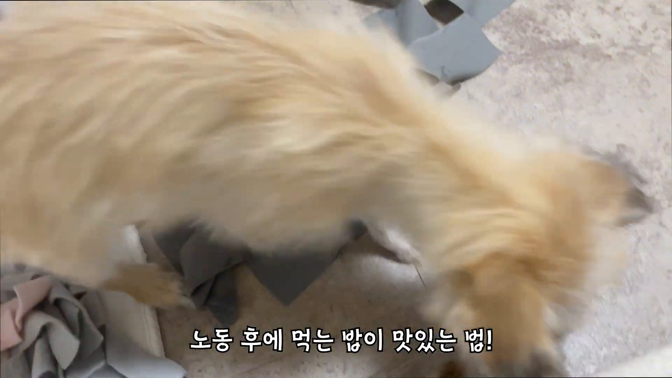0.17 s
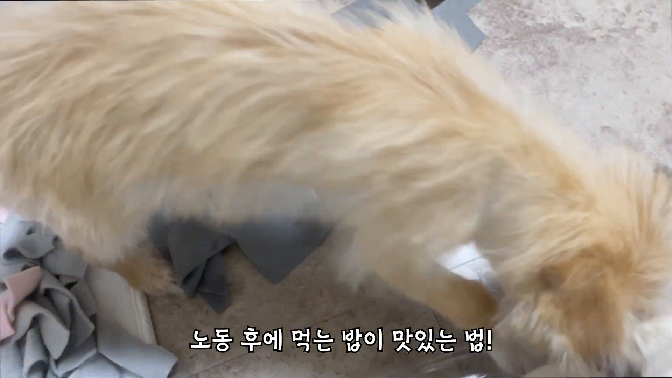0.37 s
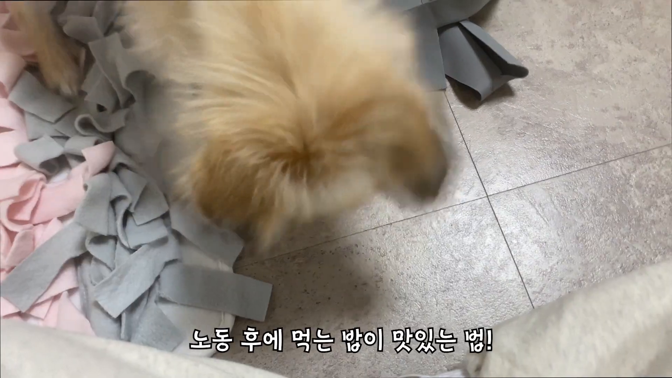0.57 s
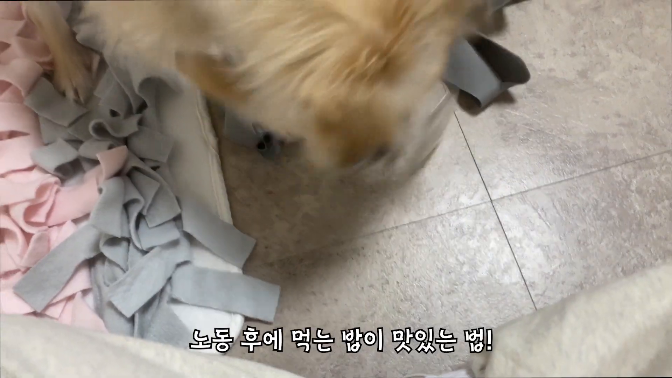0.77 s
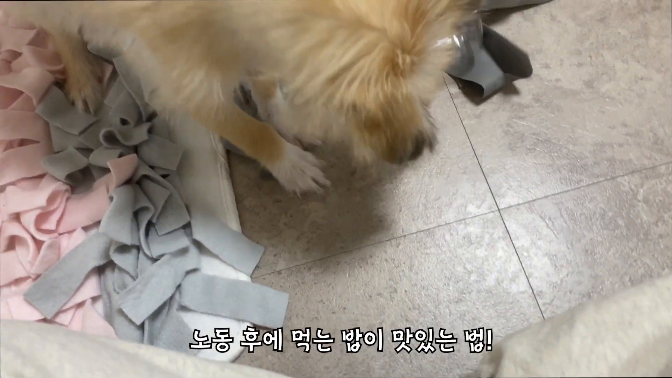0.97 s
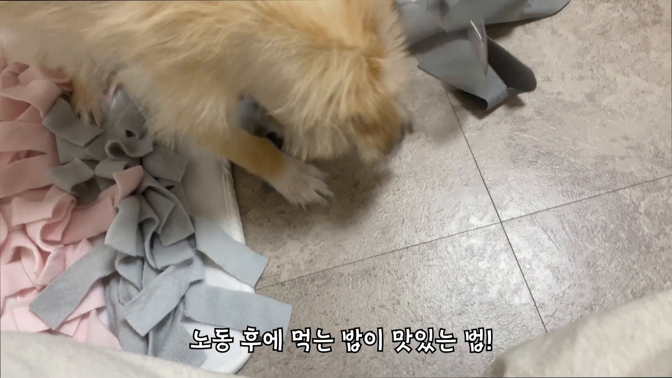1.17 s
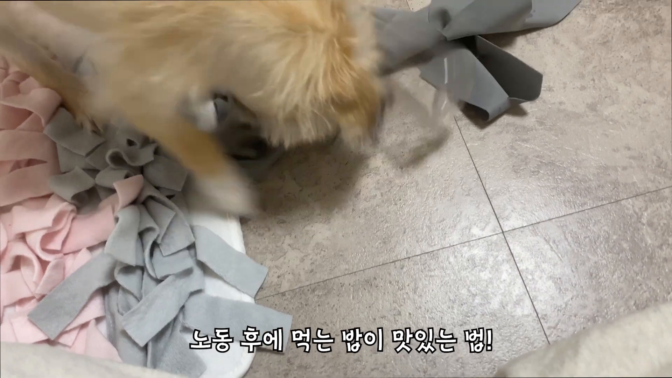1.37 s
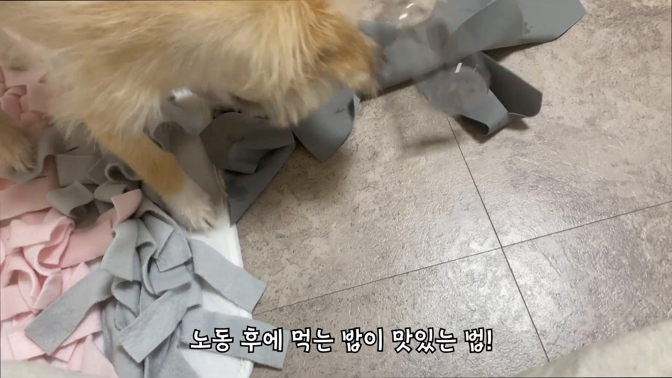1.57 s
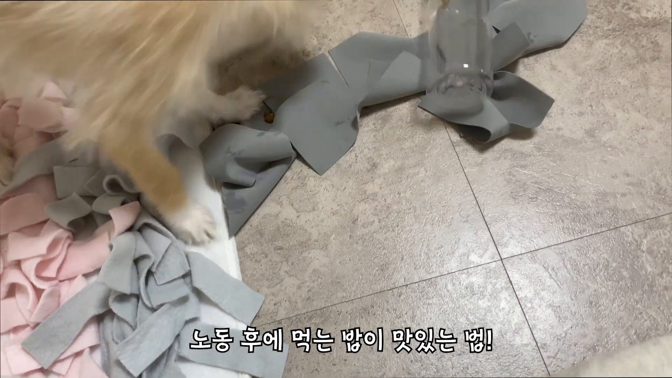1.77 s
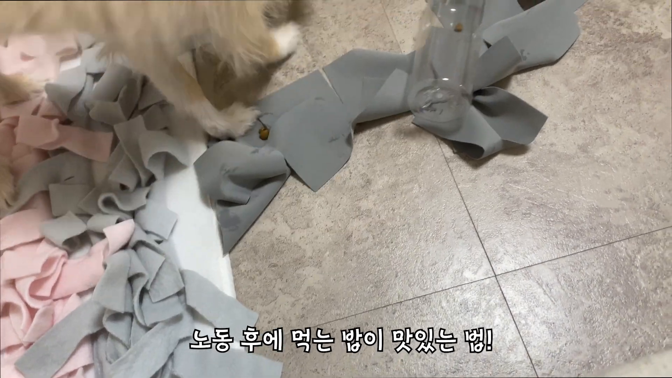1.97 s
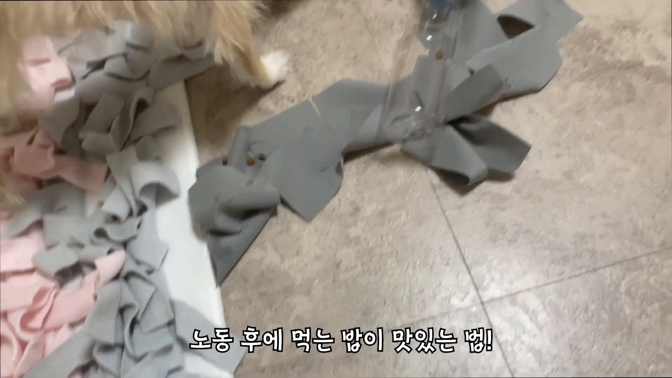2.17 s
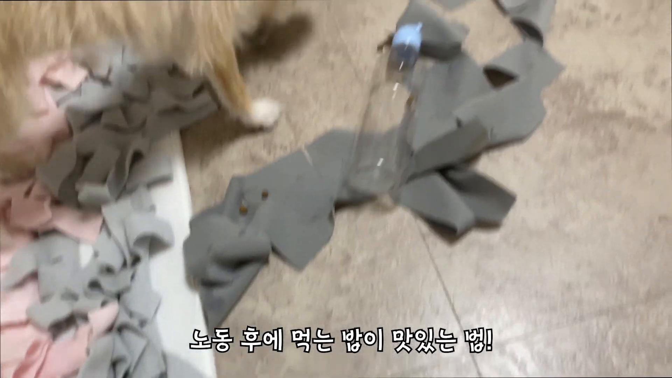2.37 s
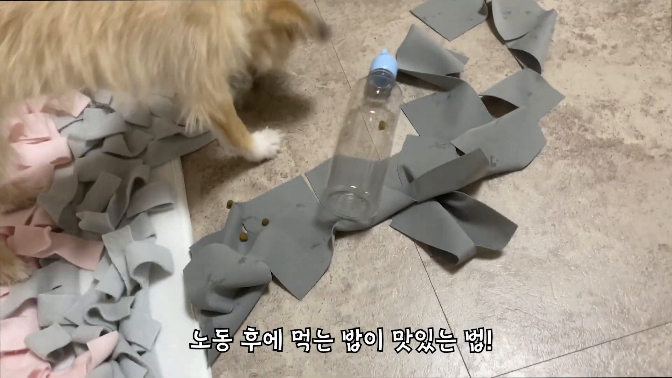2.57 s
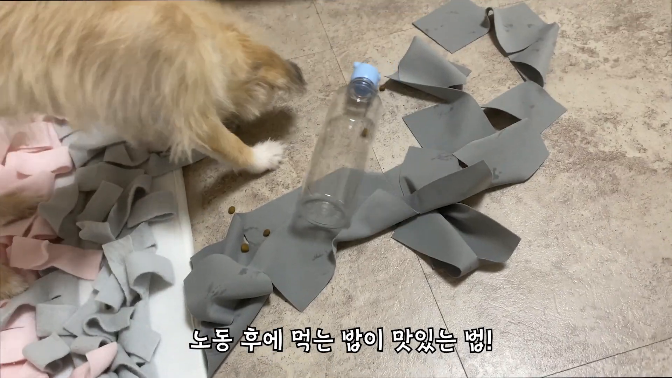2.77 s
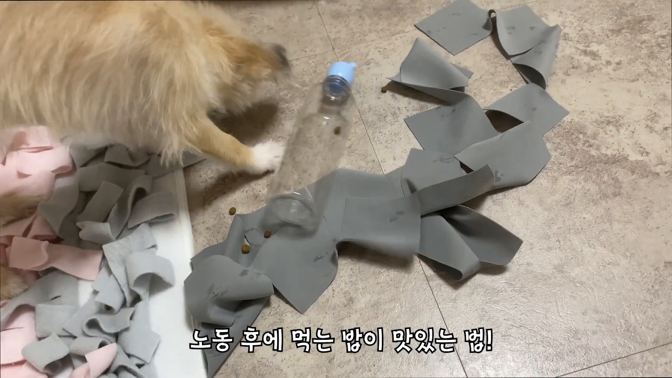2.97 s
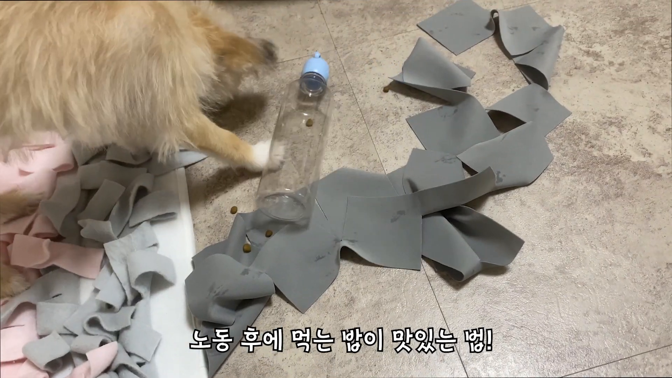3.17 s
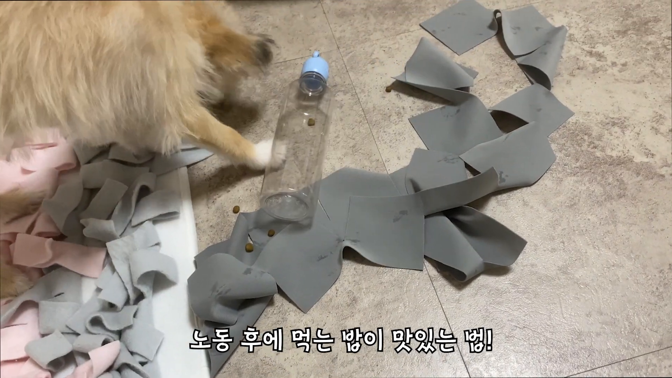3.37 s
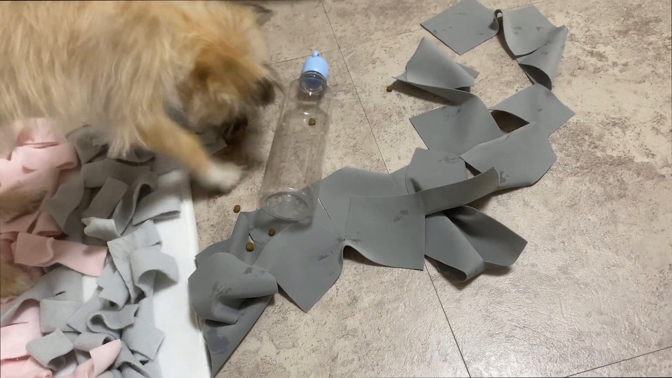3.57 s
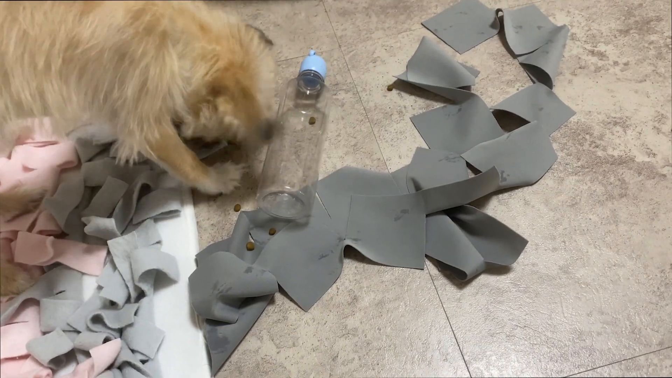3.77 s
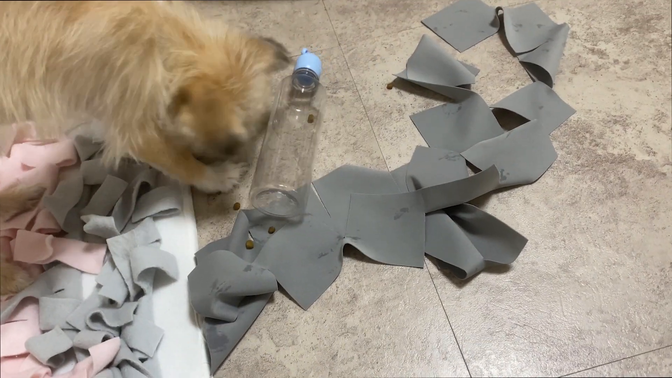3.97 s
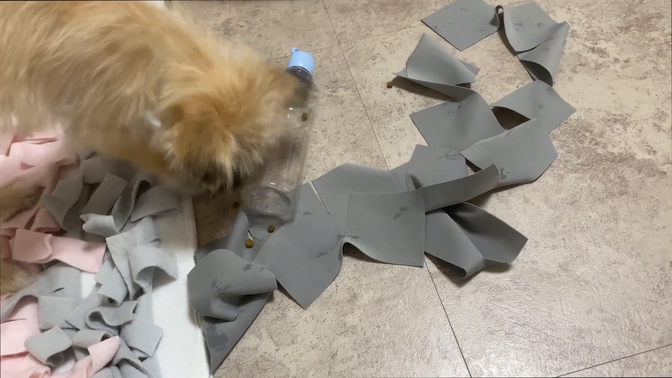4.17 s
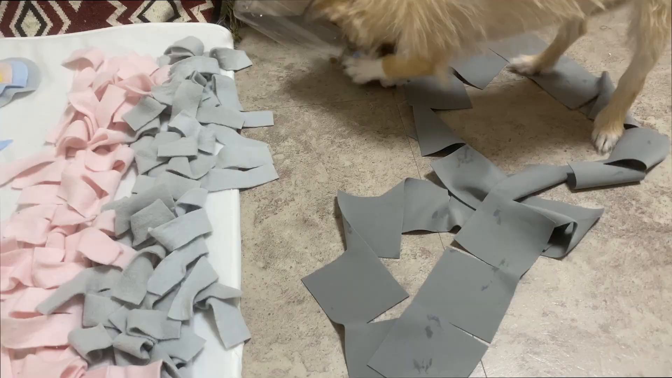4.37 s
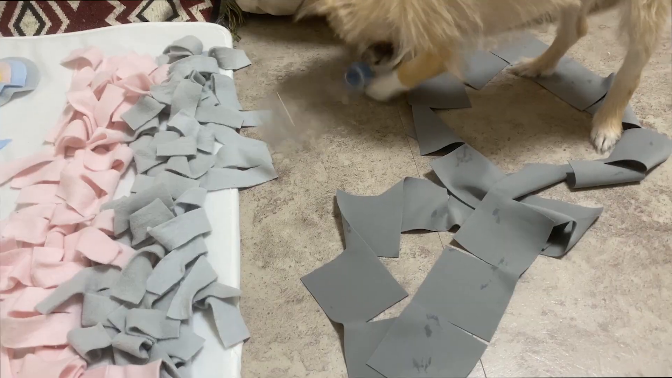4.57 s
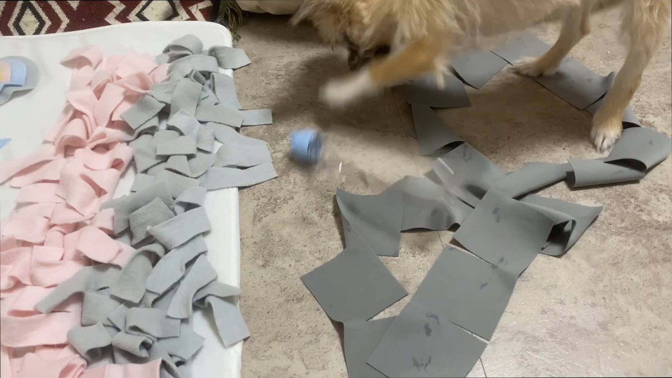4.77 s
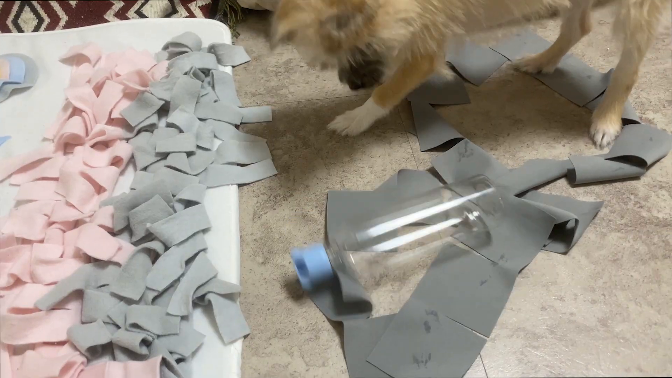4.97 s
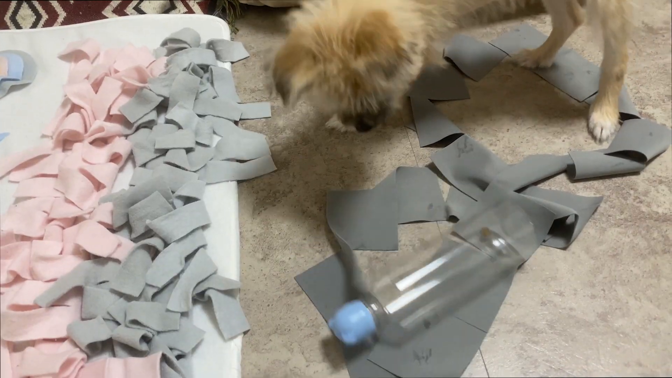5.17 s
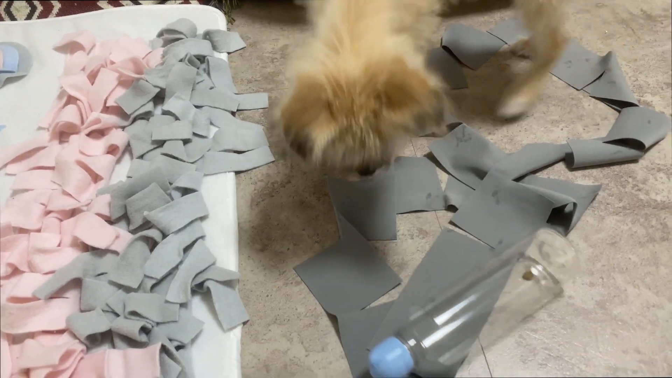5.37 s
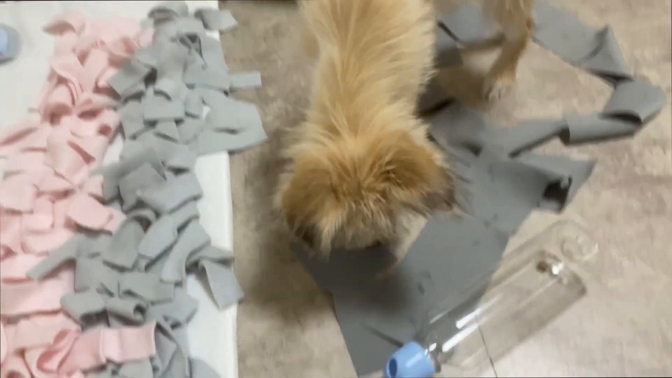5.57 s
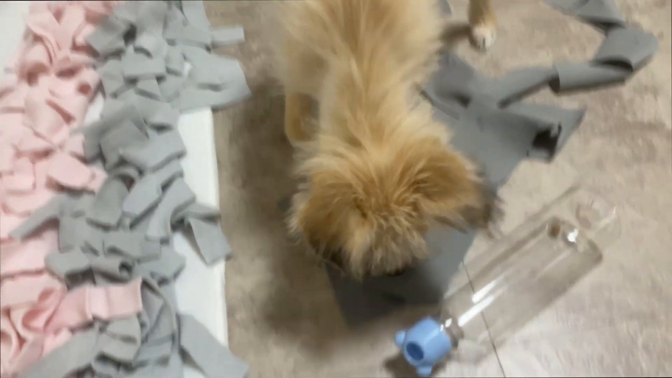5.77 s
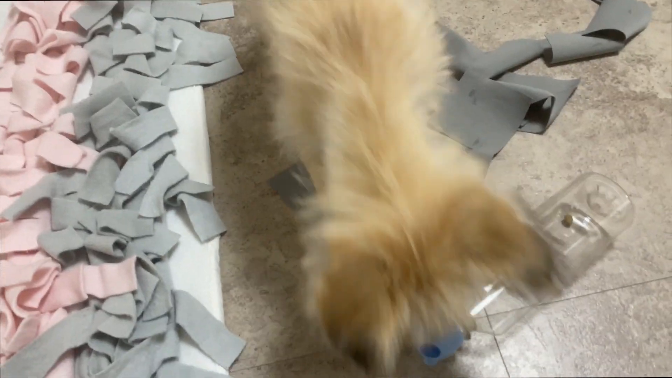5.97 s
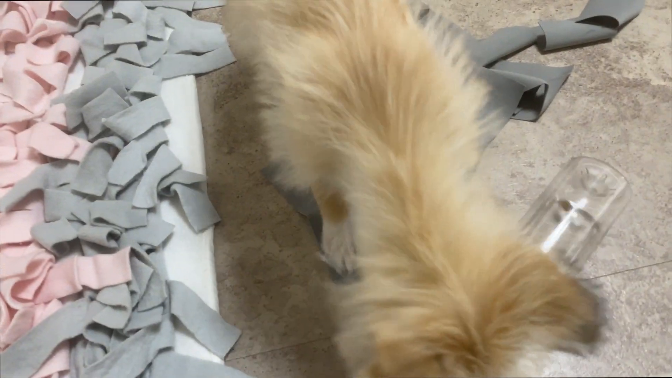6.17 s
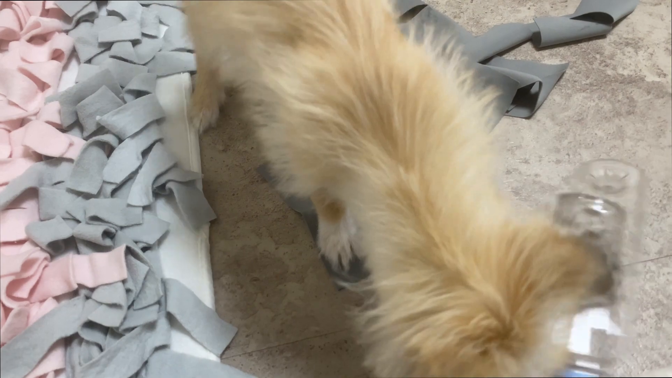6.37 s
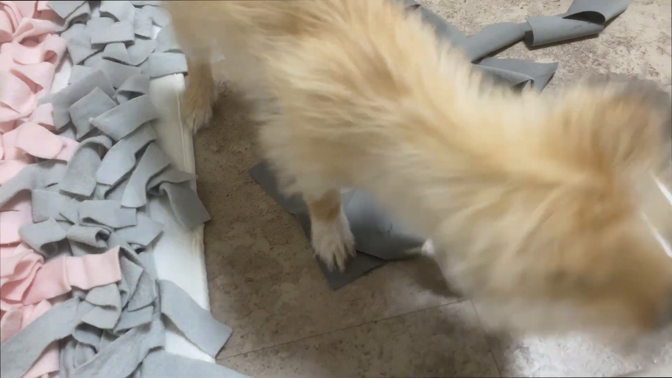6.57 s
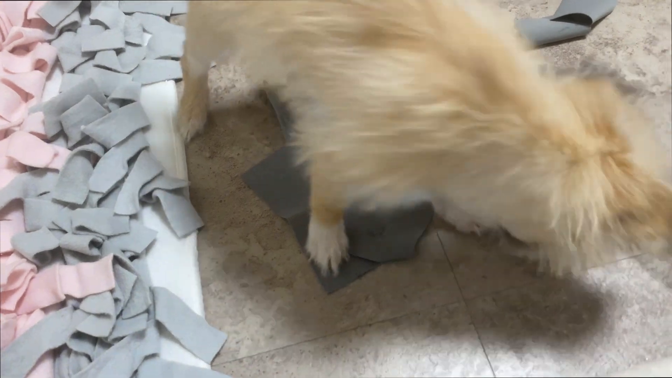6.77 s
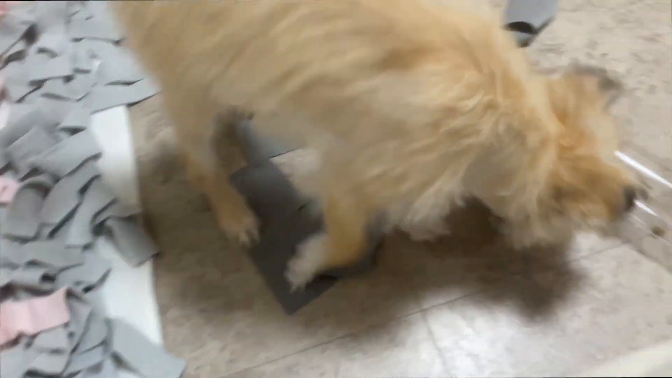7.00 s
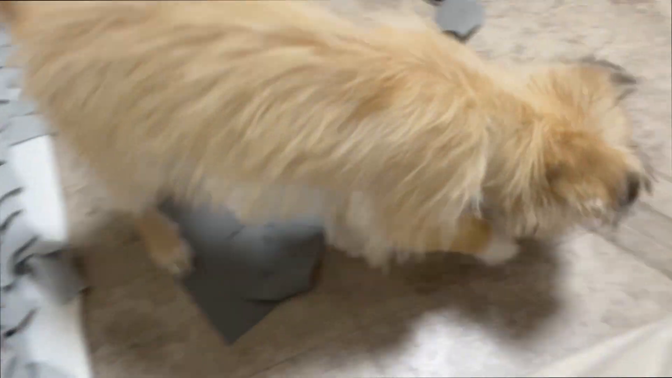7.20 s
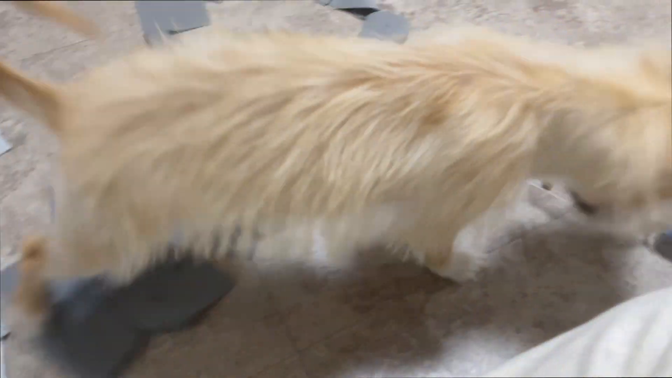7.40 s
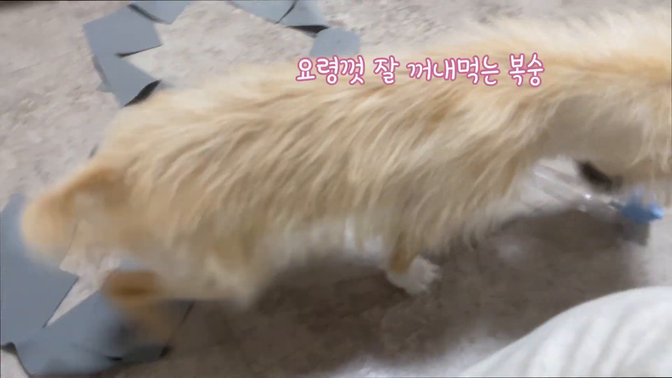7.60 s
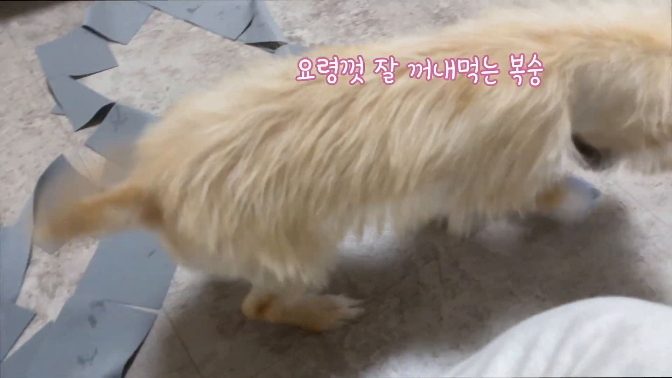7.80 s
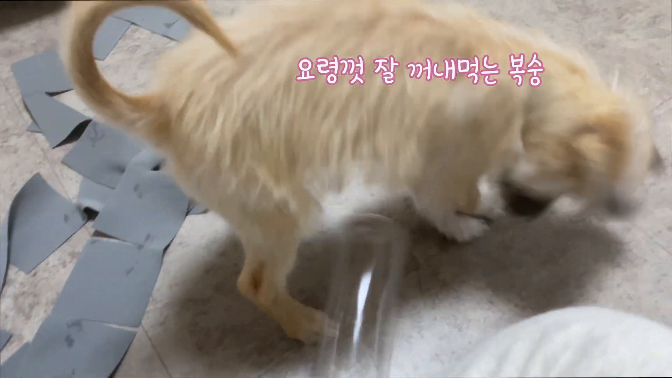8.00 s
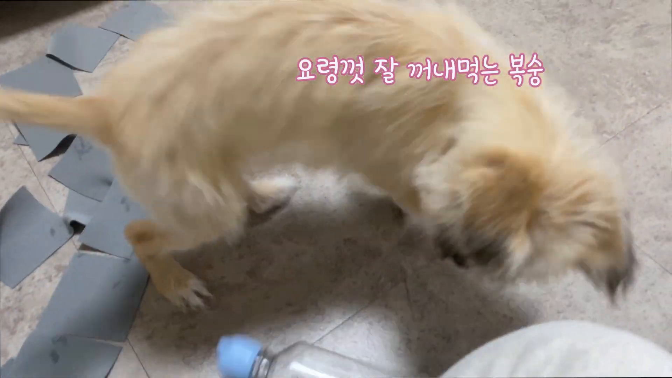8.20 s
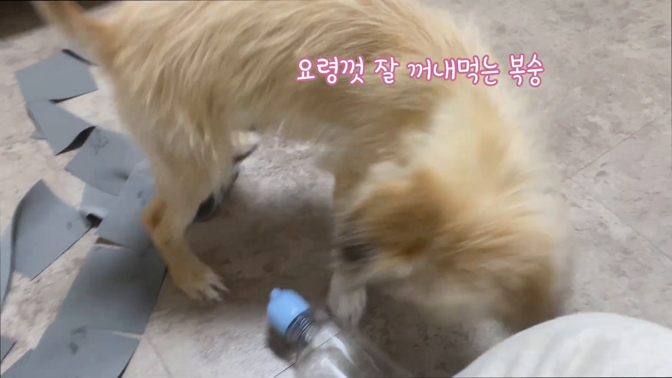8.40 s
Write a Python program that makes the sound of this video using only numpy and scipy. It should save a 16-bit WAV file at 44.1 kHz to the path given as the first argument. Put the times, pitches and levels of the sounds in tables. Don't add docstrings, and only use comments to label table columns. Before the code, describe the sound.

Dry kibble rattles and clinks inside a thin plastic bottle knocking on a hard floor, with a quiet, faintly humming pause before more tumbling.

```python
import sys
import numpy as np
from scipy import signal
from scipy.fft import rfft, irfft, next_fast_len
from scipy.io import wavfile
from scipy.ndimage import map_coordinates

SR = 44100
rng = np.random.default_rng(int(sys.argv[2]) if len(sys.argv) > 2 else 0)


def output_pcm(signal):
    pcm = np.clip(np.atleast_2d(signal).T, -1, 1) * 32767
    wavfile.write(sys.argv[1], SR, np.round(pcm).astype(np.int16))


def linear_from_db(decibels):
    return 10 ** (np.asarray(decibels, float) / 20)


N = 372204
SCENE_CHANGE_S = 4.413

# time_s, rumble_db, wash_db
TRAFFIC_LEVELS = [
    [(0.0, -54, -52), (0.47, -40.5, -60), (4.26, -45, -59), (4.41, -46.5, -61)],
    [(4.42, -48, -76.5), (5.06, -52, -75), (7.57, -52, -75.5), (8.44, -47.5, -77)],
]
# time_s, pitch_hz, level_db
ENGINE_DRONE = [(0.0, 55.0, -48.5), (1.98, 62.4, -49.5), (2.33, 51.8, -51.5), (4.41, 61.0, -41.5)]
# time_s, pitch_hz, level_db
GEAR_WHINE = [(2.5, 233.8, -82), (3.6, 253.5, -63.5), (4.324, 271.3, -53.5), (4.41, 266, -72.5)]
# freq_hz, density_db
RUMBLE_SPECTRUM = [(15, -36), (28, -11), (59, 0.5), (91, -15), (114, -18), (164, -27), (200, -30.5),
                   (260, -59.5), (440, -120)]
WASH_SPECTRUM = [(59, -32.5), (100, -2.5), (166, -34), (241, -11), (461, -24.5), (1010, -32), (2260, -41),
                 (4000, -54.5), (5200, -86.5), (8800, -120)]
MIC_HISS_SPECTRUM = [(1500, -8), (4000, -4), (9000, -3.5), (11500, -1.5), (13500, -20)]
# freq_hz, left_right_likeness
FAR_LIKENESS = [(60, 1), (380, 0.5), (2380, -0.34), (15000, -0.05)]
# freq_hz, left_minus_right_db
FAR_TILT = [(60, 2), (200, 1), (380, 1), (700, 3.5), (1800, 0.5), (4400, -4.5), (8120, -5), (15000, 5)]

# freq_hz, width_hz, level_db
MOUTH_MODES = [(211, 7, 0)]
HOLLOW_MODES = [(212.3, 21, 0)]
BARREL_MODES = [(380, 390, 6.5), (560, 43, -3.5), (732.9, 19, -0.5)]
BELLY_MODES = [(430, 170, -9), (523, 180, -4), (732, 31, -12), (684, 1400, 9)]
RING_MODES = [(1079, 34, -7), (1122, 38, -3), (1165, 130, -14), (973, 57, -26.5), (1294.6, 810, -13.5)]
WALL_MODES = [(1735, 150, -11), (2150, 170, -9.5), (2380, 190, 0.5), (1898, 280, -9.5)]
SCRAPE_MODES = [(1670, 150, -11.5), (2150, 80, -11), (2381, 110, -2.5)]
TICK_MODES = [(3930, 670, 2.5), (3890, 150, -6.5), (4580, 230, -6), (4770, 600, -2.5), (5540, 350, -2.5),
              (6390, 408, -5)]
SLIDE_MODES = [(4330, 130, -3), (4800, 220, -4), (5430, 260, -2), (6600, 700, 0)]
SNAP_MODES = [(7100, 2200, -1.5), (9000, 1800, 4), (11300, 1900, -6.5)]

# peak_s, swell_s, fade_s, strength_db, dryness_db
SLUMPS = [(0.03, 0.6, 0.29, -41, -1), (.344, 0.082, 0.27, -46, -0.5), (0.789, 0.16, 0.14, -47.5, 7.5),
          (.95, 0.24, 0.12, -58, 0.5), (1.22, 0.18, 0.12, -55, 3.5), (1.407, 0.14, 0.13, -48.5, 1.5),
          (1.54, 0.018, 0.071, -40, 0.5), (1.719, .12, 0.13, -54, 5.5), (4.513, 0.04, 0.087, -61.5, -2.5),
          (4.612, 0.051, 0.048, -31, -14), (4.69, 0.024, 0.045, -36.5, -4.5),
          (4.764, 0.28, 0.13, -44.5, -3.5), (5.0, 0.094, 0.32, -66, 2.5), (5.113, 0.13, 0.072, -54, 2),
          (6.299, 0.043, 0.17, -61, 19), (6.42, 0.26, 0.28, -56, -3), (6.685, 0.23, 0.081, -60.5, -11.5),
          (7.872, 0.11, 0.2, -49, -1), (8.107, 0.33, 0.1, -52.5, 2), (8.236, 0.21, 0.15, -47, -3.5),
          (8.32, 0.054, 0.29, -49, -6.5)]
# peak_s, swell_s, fade_s, strength_db, dryness_db
BRUSHES = [(2.22, 0.034, 0.055, -81.5, 6), (2.38, 0.064, .06, -66, 1.5), (2.739, 0.072, 0.094, -80.5, 6.5),
           (3.177, 0.077, 0.086, -62.5, -2), (3.442, 0.044, 0.098, -82, 4.5), (3.551, 0.25, .9, -86.5, -23),
           (3.746, 0.05, 0.07, -91.5, 11.5), (4.325, 0.071, 0.088, -77.5, 0.5),
           (5.388, 0.026, 0.057, -65, -18.5), (5.63, 0.025, 0.13, -73.5, -9), (5.8, 0.11, 0.067, -65, -11),
           (6.156, 0.038, 0.085, -82.5, 1), (7.004, 0.095, 0.16, -77.5, -15.5),
           (7.38, 0.11, 0.082, -86.5, 14), (7.643, 0.033, 0.083, -78, 8.5)]
# time_s, strength_db
ROLLING = [(0.0, -49), (0.45, -46), (0.54, -64), (1.1, -59), (1.42, -46), (1.78, -52.5), (1.9, -66),
           (5.15, -60), (5.3, -86.5), (6.18, -81.5), (6.3, -56.5), (6.75, -69), (7.68, -70.5), (7.9, -49.5),
           (8.44, -55)]
# time_s, brightness_db
SLIDE_BRIGHTNESS = [(0, 0), (.5, -2.5), (.7, 9), (1.3, 5.5), (1.5, 5), (1.8, 0.5), (4.5, -1), (5.2, 4),
                    (6.3, 0), (8.44, -0.5)]
# time_s, ring_db, wall_db
HEAP_SEAT = [(0, -4.5, 1), (.1, -12, -3.5), (.14, 0.5, 2.5), (.45, -5.5, -2.5), (1.2, 4.5, 4.5),
             (1.8, -3.5, 2.5), (4.5, 1, -6.5), (4.8, 1.5, 0.5), (5.2, -3, 0), (6.3, -5, -5),
             (6.55, -5, 3.5), (6.62, -16, 1), (6.8, -3, 3), (7.8, -2, 0), (7.92, 0, 2), (8.04, -1, 3.5),
             (8.44, -1.5, -6)]

# start_s, peak_db
SPARKS = [(0.0174, -40), (0.0642, -46), (0.1156, -46), (0.1446, -44), (0.1715, -43), (0.3361, -40.5),
          (0.3656, -40.5), (0.4034, -49), (0.4295, -47), (2.2144, -61), (2.609, -59), (3.102, -65),
          (3.1474, -69), (3.1573, -49), (3.1877, -58.5), (3.7194, -66), (3.7503, -58.5), (3.7733, -59),
          (4.3086, -60.5), (5.1123, -43), (6.354, -35.5), (6.3669, -35), (6.5899, -62.5), (6.663, -56.5),
          (7.8326, -48), (7.8554, -42), (7.872, -46), (7.9994, -42), (8.0426, -41)]
# start_s, peak_db
TAPS = [(0.0144, -36), (0.0744, -37), (0.1166, -36), (6.4373, -35.5), (6.4613, -50), (6.488, -51),
        (6.5076, -52), (6.5331, -55), (6.575, -57), (6.5909, -55), (6.6179, -49), (6.674, -55),
        (7.883, -41), (7.9096, -42), (7.9914, -37), (8.0222, -45)]
# start_s, peak_db, pitch_hz
CLINKS = [(.018, -36, 3780), (.034, -48.5, 3940), (.065, -41, 4700), (.1176, -32, 3830),
          (.147, -32, 4000), (.158, -36, 3930), (.172, -33, 3890), (.197, -33, 4060),
          (.2086, -39, 3750), (.387, -32, 4390), (.6434, -47, 4000), (.6629, -39, 4200),
          (.674, -35, 3830), (.7527, -18.5, 4690), (.7731, -23, 4380), (.794, -25, 4190),
          (.8097, -29.5, 4330), (1.1189, -46, 4400), (1.197, -27.5, 5500), (1.2028, -23.5, 5490),
          (1.2312, -24, 5300), (1.293, -34.5, 5250), (1.3113, -33, 5270), (1.3264, -26.5, 5480),
          (1.3526, -31.5, 5430), (1.37, -27, 5390), (1.4015, -15, 3930), (1.423, -33, 3966),
          (1.531, -29.5, 4700), (1.5764, -35.5, 3840), (1.7132, -43, 3880), (1.759, -40, 3730),
          (1.8655, -51, 3950),
          (4.5634, -32.5, 5170), (4.7425, -24.5, 5260), (4.7856, -31, 3820), (4.8527, -36.5, 3920),
               (5.0744, -45, 3810), (5.087, -40, 4630), (5.1123, -47.5, 4590), (6.2753, -40, 4650),
               (6.2898, -36, 4930), (6.3668, -43, 4500), (6.4662, -52, 6130), (7.8186, -49.5, 4780),
               (7.846, -44, 4800), (7.9543, -31, 4610), (8.0194, -40, 4720), (8.1372, -38, 4700),
               (8.1449, -38, 4930), (8.1738, -37, 4170), (8.2155, -24.5, 4030), (8.2512, -36, 4230)]
# start_s, peak_db, pitch_hz, t60_s
PANEL_DENTS = [(.108, -30, 1170, 0.03), (.4734, -4, 1156, 0.04), (.4734, -23, 572, 0.075),
               (.4734, -16.5, 1525, 0.041), (.7173, -17, 1076, 0.051), (.7173, -29.5, 1720, 0.11),
               (1.1707, -12.5, 1025, 0.03), (1.3384, -8, 1131, 0.048), (1.3384, -19, 1547, .025),
               (1.3902, -37, 3035, 0.035), (1.6404, -10, 1140, 0.04), (1.6404, -14.5, 2220, 0.012),
               (2.378, -56.5, 1102, 0.093), (2.378, -58.5, 2346, 0.074), (2.838, -65, 2406, .12),
               (4.5077, -27.5, 1300, 0.083), (4.5077, -31.5, 922, 0.056), (4.5077, -35, 1742, 0.049),
               (4.598, -28.5, 1664, 0.14), (4.598, -12.5, 2435, 0.023), (4.7435, -26, 1143, 0.079),
               (4.966, -38, 3930, 0.083), (5.035, -35, 2150, 0.036), (5.043, -30, 3400, 0.013),
               (5.088, -42.5, 2150, 0.045), (5.128, -42.5, 2140, 0.057), (5.178, -47, 2120, 0.043),
               (6.2203, -28.5, 2280, 0.031), (6.341, -34.5, 2150, 0.071), (7.93, -31, 2317, 0.037),
               (7.955, -22.5, 2373, 0.03), (8.059, -21, 460, 0.021), (8.059, -38, 1530, 0.027),
               (8.0971, -17, 2016, 0.017), (8.0971, -18.5, 633, 0.052), (8.1839, -32.5, 426, 0.031),
               (8.231, -20.5, 1990, 0.016), (8.231, -19, 1083, 0.1), (8.2915, -24, 1795, 0.032),
               (8.339, -30, 1810, 0.044)]

# start_s, strength_db, rim_over_db, flat_over_db, crispness_db
EARLY_BOUNCES = [(0.1348, -38, 7.5, 3.5, 6), (0.291, -37, 6, 9.5, 5.5), (.313, -35.5, -10, 10, 4.5),
                 (0.4736, -5.5, -8, -4, 6), (0.7174, -14.5, 2.5, 1, -1), (0.8735, -36.5, -2, -32, 18),
                 (1.1708, -13.5, -3.5, -5, -7.5), (1.3382, -5, -4.5, -25, -7.5),
                 (1.3902, -11.5, 1.5, -23, -1), (1.4019, -25.5, -1, 4, 14), (1.5185, -13, 2, 1.5, -1),
                 (1.5462, -25.5, 6, 1.5, 10), (1.6409, -9.5, 5, -23.5, -4)]
LATE_BOUNCES = [(4.5077, -27.5, 7, -7.5, -0.5), (4.5568, -15, -10.5, -17, 4), (4.598, -9, -6.5, -36, 8),
                (4.6739, -8, -0.5, -23, -3.5), (4.7434, -15, 0, -44, -20.5), (4.7987, -29.5, 1, 0.5, 12.5),
                (6.2205, -23, -2.5, -7.5, 9), (6.2766, -22, -3.5, -4, 19), (6.3125, -27, -3, -0.5, 2),
                (6.341, -45.5, 10.5, 15, 18), (8.059, -20, -4.5, -4, 10), (8.0971, -7, -9.5, -6.5, -0.5),
                (8.1837, -31.5, 7.5, 5.5, -2), (8.231, -12, -9, -3, -1.5), (8.2916, -10, -7, -7, -5),
                (8.339, -14.5, -6.5, -4, -3.5), (8.4354, -14, -3.5, -4, -10)]
# start_s, strength_db, weight_db, crispness_db
PELLETS = [(.336, -33.5, 2.5, -18.5), (0.362, -36, 7, -20), (0.5252, -39.5, 5, -3), (0.7538, -28, 9.5, 4),
           (0.7735, -48.5, 21, 13.5), (.7966, -32, -3, 7), (1.1978, -32.5, -19, -8), (1.231, -43.5, 2, 5.5),
           (1.3009, -46, 0, 1), (1.4483, -37, -7, 0), (1.4752, -40, 2, 0), (1.7279, -38.5, 3, -45),
           (1.8238, -49.5, -13, -15.5), (1.8885, -57.5, 9.5, -22.5), (4.8208, -42.5, 3, -10),
           (4.9648, -36, -6, 9), (4.994, -42.5, 11.5, 4), (5.0356, -40, 5, -1), (5.046, -41.5, 12.5, -11),
           (5.088, -42, 7, 14.5), (5.127, -45.5, 5, 5.5), (5.1777, -46, -16, -20), (6.3954, -56.5, 21.5, 7),
           (6.4166, -64.5, 25, 16.5), (7.9292, -44.5, 20, 13), (7.9543, -36.5, -10, 12.5),
           (7.9803, -35, -2, 1.5), (8.1449, -40.5, -21, 7.5), (8.2174, -39.5, 1, 1), (8.386, -37, 12.5, -1)]
# start_s,
# strength_db, weight_db, crispness_db
TOUCHES = [(1.957, -81, 4.5, 24.5), (2.091, -77.5, 21, 19.5), (2.1662, -83.5, 9.5, 31), (2.73, -64, 3, 10),
           (2.837, -69, 18.5, -7), (3.416, -68.5, -7.5, 20), (4.413, -78.5, 6, -3), (5.3686, -78, 26.5, -3),
           (5.46, -65, 6.5, 1), (6.1479, -60, 1, -1), (7.6246, -53.5, 3.5, -12.5)]
# start_s, peak_db
MOUTH_SLAPS = [
    (0.36, -44),
    (0.474, -46),
    (1.391, -32),
    (1.544, -40),
    (1.64, -35.5),
    (4.681, -44),
    (6.221, -47.5),
    (7.016, -52),
    (7.979, -37.5),
    (8.387, -39),
]
# start_s, peak_db, pitch_hz
PAW_THUDS = [(2.388, -32, 188), (4.578, -21, 276), (4.602, -19.5, 201), (4.771, -27.5, 227),
             (4.789, -27, 294), (4.871, -29.5, 220), (4.952, -40.5, 237), (4.996, -34.5, 230),
             (5.052, -39.5, 259), (6.952, -42.5, 230), (7.161, -39, 164.2)]

# freq_hz, left_minus_right_db
BOTTLE_TILT = [(110, -2.5), (200, 4), (380, 1.5), (1290, 2.4), (2380, 0.5), (4400, -3.5), (8120, -3.5),
               (15000, 2.5)]
# freq_hz, left_lead_rad
PORT_LEAD = [(0, 0), (860, -0.4), (3450, -1.0), (5170, -1.3), (5940, -2.0), (7410, -7.9), (9220, -8.3),
             (13000, -6.4)]
# time_s, left_minus_right_db
BOTTLE_PLACE = [(0.0, 0), (1.57, 2), (5.57, 0.5), (5.78, 2), (6.04, -2), (6.25, 4), (7.01, 2.5), (7.8, 3.5),
                (7.97, 0), (8.44, 0.5)]
# freq_hz, t60_s
ROOM_DECAY = [(200, 0.22), (1000, 0.13), (3000, 0.13), (10000, 0.14)]


def unit(x):
    return x / np.sqrt(np.mean(x ** 2) + 1e-20)


def along(points, hz):
    f, v = np.transpose(points)
    return np.interp(np.log(hz + 1), np.log(f + 1), v)


def curves(rows):
    s, *cols = np.transpose(rows)
    return [np.interp(np.arange(N) / SR, s, c) for c in cols]


def wobble(rate_hz):
    knots = rng.standard_normal(int(N * rate_hz / SR) + 4)
    return map_coordinates(knots, [np.arange(N) * rate_hz / SR])


def filtered(x, response):
    m = next_fast_len(N + SR // 2)
    return irfft(rfft(x, m) * response(np.fft.rfftfreq(m, 1 / SR)), m)[..., :N]


def opposed(db):
    return linear_from_db(np.outer([.5, -.5], db))


def swells(peak_s, swell_s, fade_s, db):
    span_db = 20
    peak_s, swell_s, fade_s, db = [np.reshape(v, (-1, 1)) for v in (peak_s, swell_s, fade_s, db)]
    t = np.arange(0, N, 64) / SR
    late = t - peak_s
    away = np.where(late < 0, -late / swell_s, late / fade_s)
    power = np.sum(linear_from_db(2 * (db - span_db * (away + away ** 2) / 2)), axis=0)
    return np.interp(np.arange(N) / SR, t, 10 * np.log10(power + 1e-12))


def rung(modes, at, sizes, scatter_db, turning_db=0):
    luck = rng.standard_normal((len(at), len(modes)))
    knots = rng.standard_normal((len(modes), 70))
    out = np.zeros(N)
    for k, (hz, width_hz, db) in enumerate(modes):
        db = db + turning_db * np.interp(at / N * 69, np.arange(70), knots[k])
        pole, turn = np.exp(-np.pi * width_hz / SR), 2 * np.pi * hz / SR
        blows = np.bincount(at, sizes * linear_from_db(db + scatter_db * luck[:, k]), N)
        out += signal.lfilter([0, np.sin(turn)], [1, -2 * pole * np.cos(turn), pole ** 2], blows)
    edges_hz = [.7 * min(modes)[0], min(1.3 * max(modes)[0], .4 * SR)]
    return signal.sosfilt(signal.butter(3, edges_hz, "band", fs=SR, output="sos"), out)


def rush(spectrum):
    def mid_side(hz):
        turn = np.arccos(np.clip(along(FAR_LIKENESS, hz), -1, 1)) / 2
        return linear_from_db(along(spectrum, hz)) * [np.cos(turn), np.sin(turn)]

    mid, side = filtered(rng.standard_normal((2, N)), mid_side)
    pair = np.array([mid + side, mid - side])
    return unit(filtered(pair, lambda hz: opposed(along(FAR_TILT, hz))))


def traffic():
    rumble_db, wash_db = curves(TRAFFIC_LEVELS[0] + TRAFFIC_LEVELS[1])
    t = np.arange(N) / SR
    lines = 0
    for rows, flutter_db in ((ENGINE_DRONE, 2.5), (GEAR_WHINE, 1.8)):
        hz, db = curves(rows)
        on = (t > rows[0][0]) & (t < SCENE_CHANGE_S)
        tone = np.sin(2 * np.pi * np.cumsum(hz) / SR)
        lines = lines + on * 1.9 * linear_from_db(db + flutter_db * wobble(15)) * tone
    sway_db = 1.5 * wobble(3)
    bed = linear_from_db(rumble_db + sway_db) * rush(RUMBLE_SPECTRUM)
    bed = bed + linear_from_db(wash_db + 4) * rush(WASH_SPECTRUM)
    bed = bed + linear_from_db(-84) * rush(MIC_HISS_SPECTRUM)
    return bed + lines * linear_from_db([[.8], [-.8]])


def tumble():
    *shape, heap_db, dry_db = np.transpose(SLUMPS + BRUSHES)
    kibble = np.arange(len(dry_db)) < len(SLUMPS)
    long_slump_s = 0.33
    kibble_belly_db = -0.5 - 0.79 * dry_db + 20 * np.log10(shape[2] / long_slump_s)
    clatter_db = swells(*shape, heap_db)
    tick_db = swells(*shape, heap_db + np.minimum(dry_db, 10))
    snap_db = swells(*shape, heap_db + np.where(kibble, -12 + dry_db, -5.5 + 1.35 * dry_db))
    belly_db = swells(*shape, heap_db + np.where(kibble, kibble_belly_db, -11))

    s, blow_db = np.transpose(EARLY_BOUNCES + LATE_BOUNCES)[:2]
    delay_s, fade_s = 0.0086, 0.02
    shaken = linear_from_db(swells(s + delay_s, delay_s, fade_s, blow_db - 23))
    ring_db = 20 * np.log10(np.hypot(shaken, linear_from_db(swells(*shape, heap_db + 8))))

    (air_db,), (bright_db,) = curves(ROLLING), curves(SLIDE_BRIGHTNESS)
    seat_ring_db, seat_wall_db = curves(HEAP_SEAT)
    at = (rng.random(20000) * (N - 1)).astype(int)
    clumps = linear_from_db(2.2 * (.5 * wobble(55) + 1.1 * wobble(150)))[at]
    grit_db = 1.5 * wobble(45)
    layers = [(RING_MODES[:3], ring_db + seat_ring_db - 7, 2.2),
              (SCRAPE_MODES, clatter_db + seat_wall_db - 3, 2.4),
              (SNAP_MODES, snap_db + 0.37 + grit_db, 2.5),
              (HOLLOW_MODES, air_db, 3),
              (BARREL_MODES, belly_db - 1.5, 1.5),
              (TICK_MODES[:4], tick_db - bright_db - 8, 2.3),
              (SLIDE_MODES, tick_db + bright_db - 7.5, 2.1)]
    out = 0
    for modes, db, uneven_db in layers:
        signs = np.sign(rng.random(len(at)) - .5)
        sizes = signs * linear_from_db(uneven_db * np.minimum(rng.exponential(size=len(at)), 6))
        out = out + linear_from_db(db) * unit(rung(modes, at, sizes * clumps, scatter_db=5, turning_db=3))
    t, restart_s = np.arange(N) / SR, 4.47
    onset = np.clip((t - SCENE_CHANGE_S) / (restart_s - SCENE_CHANGE_S), 0, 1) ** 2
    return out * np.where(t < SCENE_CHANGE_S, 1, onset)


def flicks():
    out = 0
    for rows, modes, trim_db in ((SPARKS, SNAP_MODES, 2), (TAPS, SCRAPE_MODES[1:], 1.5)):
        s, db = np.transpose(rows)
        out = out + rung(modes, np.round(s * SR).astype(int), linear_from_db(db + trim_db), 3)
    return out


def clinks():
    out, t = np.zeros(N + SR), np.arange(SR // 5) / SR
    rows = CLINKS
    clink_db, clink_t60_s = -1, 0.023
    notes = PANEL_DENTS + [(s, db + clink_db, hz, clink_t60_s) for s, db, hz in rows]
    for s, db, hz, t60_s in notes:
        way = np.sign(hz - 1400)
        wander_rad = 2.2 * hz / SR * np.cumsum(rng.standard_normal(len(t)))
        envelope = linear_from_db(db - 60 * t / t60_s) * (1 - np.exp(-t / .0004))
        out[round(s * SR):][:len(t)] += way * envelope * np.sin(2 * np.pi * hz * t + wander_rad)
    s, db, _ = np.transpose(rows)
    skip = np.arange(6)
    at = s[:, None] * SR + 70 * (rng.random((len(s), 6)) + skip)
    at = np.round(at).astype(int) - 35
    skip_db = db[:, None] - 12 - 4.5 * skip
    return out[:N] + rung(SNAP_MODES, at.ravel(), linear_from_db(skip_db).ravel(), 2.3)


def contacts():
    s, db, rim, flat, crisp = np.transpose(EARLY_BOUNCES + LATE_BOUNCES)
    hard_db = db + rim
    floor = [s, hard_db, db, db + flat, hard_db - 14 + 0.43 * crisp, hard_db - 16 + crisp]
    s, db, weight, crisp = np.transpose(PELLETS + TOUCHES)
    heavy_db = db + weight
    light = [s, heavy_db, heavy_db - 8, heavy_db - 15, db, db + crisp]
    return np.hstack([floor, light])


def knocks():
    s, *levels_db = contacts()
    luck = rng.random((len(s), 2, 7))
    late_s = .009 * luck[:, 0] ** 2 * (np.arange(7) > 0)
    at = np.clip(np.round((s[:, None] + late_s) * SR).astype(int), 0, N - 1).ravel()
    signs = np.where(late_s > 0, np.sign(luck[:, 1] - .5), 1)
    # modes, trim_db, chatter_db, chatter_fade_db_per_s
    families = [(WALL_MODES, -4, -10, 900), (RING_MODES, -6, -13, 900), (BELLY_MODES, -3, -16, 900),
                (TICK_MODES, -5, -3, 600), (SNAP_MODES, -7.5, 0.5, 600)]
    out = 0
    for (modes, trim_db, chatter_db, fade_db), db in zip(families, levels_db):
        sizes = signs * linear_from_db(db[:, None] + trim_db + (late_s > 0) * (chatter_db - fade_db * late_s))
        out = rung(modes, at, sizes.ravel(), 2.5) - out
    return out


def booms():
    s, db = np.transpose(MOUTH_SLAPS)
    return rung(MOUTH_MODES, np.round(s * SR).astype(int), linear_from_db(db + 2.5), 0)


def paws():
    out, t = np.zeros(N + SR), np.arange(SR // 10) / SR
    for s, db, hz in PAW_THUDS:
        cycles = hz * (.8 * t + .007 * (1 - np.exp(-t / .004)))
        envelope = linear_from_db(db - 60 * t / 0.042) * (1 - np.exp(-t / 0.002))
        out[round(s * SR):][:len(t)] += envelope * np.sin(2 * np.pi * cycles)
    return out[:N]


def room(x):
    hz, t, z = signal.stft(rng.standard_normal((2, SR // 2)), SR, nperseg=256)
    decay = linear_from_db(-60 * t / along(ROOM_DECAY, hz)[:, None])
    tail = signal.istft(z * decay, SR, nperseg=256)[1]
    delayed = np.pad(x, ((0, 0), (200, 0)))
    return signal.fftconvolve(delayed, tail / np.linalg.norm(tail[0]), axes=1)[:, :N]


def scene():
    lead_hz, lead_rad = np.transpose(PORT_LEAD)
    lead = np.transpose([lead_hz, np.unwrap(lead_rad)])

    def ports(hz):
        return opposed(along(BOTTLE_TILT, hz)) * np.exp(1j * np.outer([.5, -.5], along(lead, hz)))

    near = filtered(knocks() + booms() + tumble() + paws() + clinks() + flicks(), ports)
    side_db, = curves(BOTTLE_PLACE)
    near = near * opposed(side_db - side_db.mean())
    return near + linear_from_db(-10) * room(near) + traffic()


def band_limit(x):
    return signal.sosfilt(signal.butter(12, 16330, fs=SR, output="sos"), x)


def record(dry):
    def edges(hz):
        low_cut = (1j * hz / 45) ** 8 / (1 + 1j * hz / 45) ** 8
        low_lift = 12 / (1 + 11 * np.tanh(hz / 150) ** 2)
        return low_cut * low_lift / (1 + (hz / 15200) ** 24)

    heard = filtered(dry, edges)
    heard = heard / (1 + np.abs(heard / .9) ** 4) ** .25
    return band_limit(heard)


dry = scene()
out = record(dry)
output_pcm(out)
```